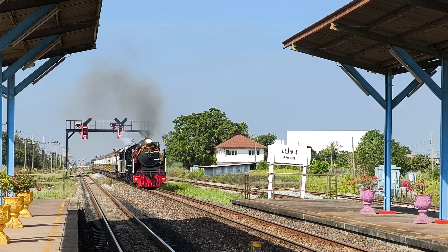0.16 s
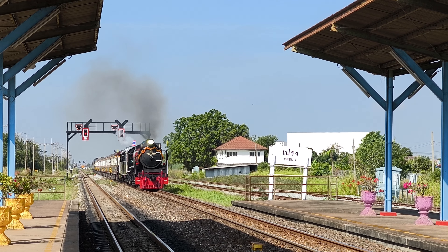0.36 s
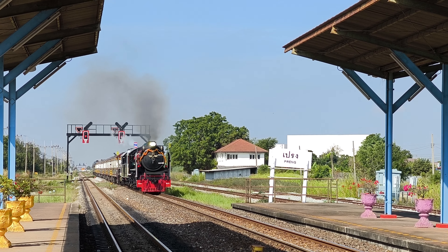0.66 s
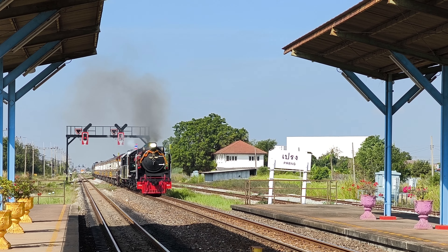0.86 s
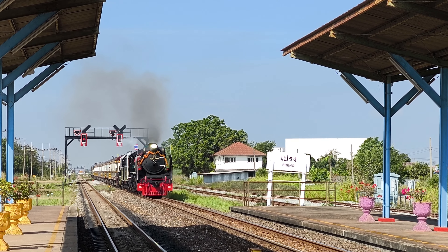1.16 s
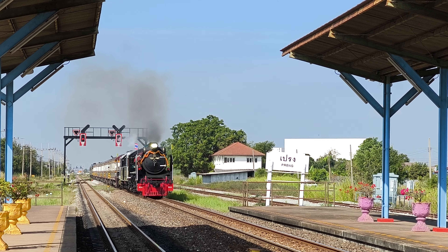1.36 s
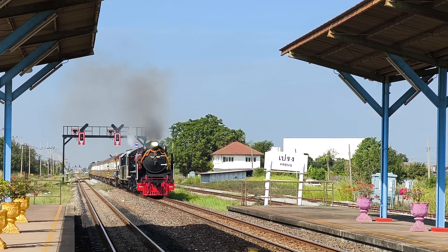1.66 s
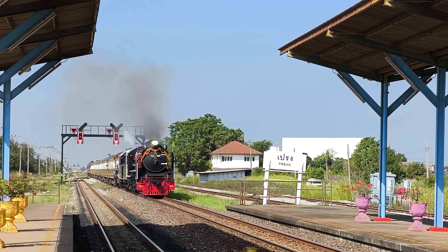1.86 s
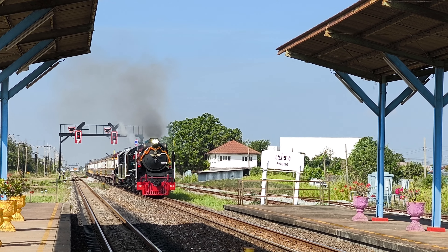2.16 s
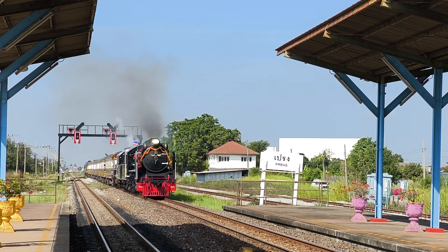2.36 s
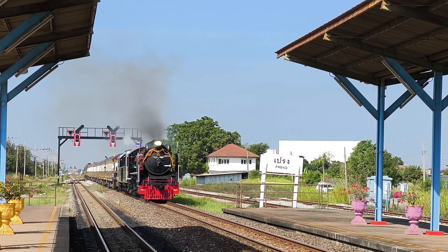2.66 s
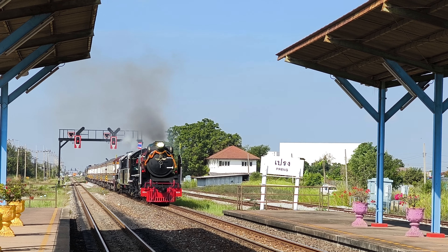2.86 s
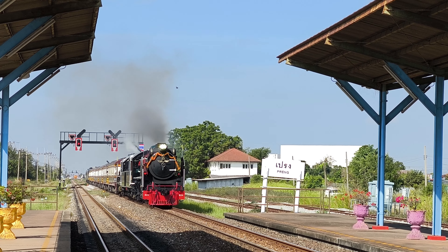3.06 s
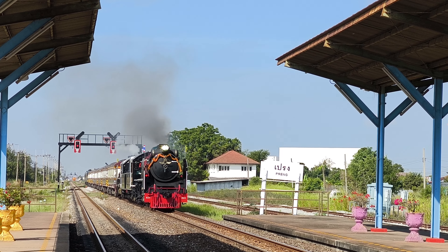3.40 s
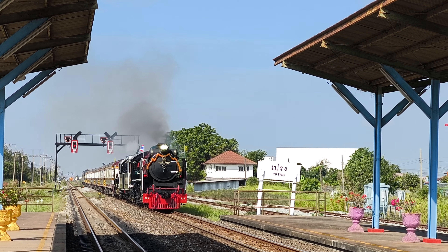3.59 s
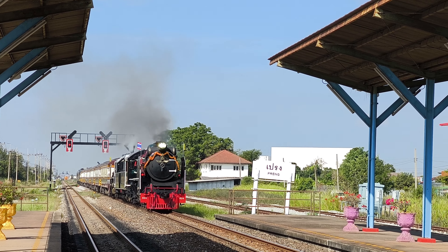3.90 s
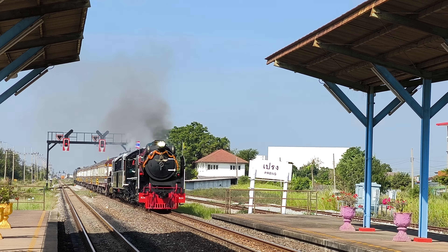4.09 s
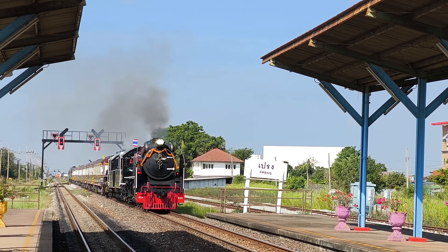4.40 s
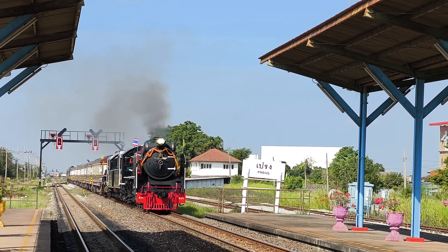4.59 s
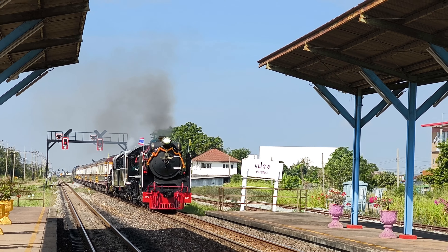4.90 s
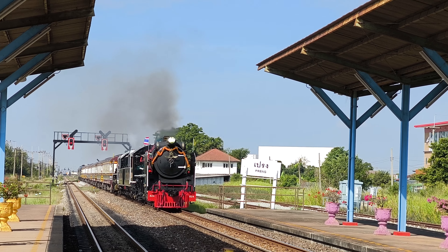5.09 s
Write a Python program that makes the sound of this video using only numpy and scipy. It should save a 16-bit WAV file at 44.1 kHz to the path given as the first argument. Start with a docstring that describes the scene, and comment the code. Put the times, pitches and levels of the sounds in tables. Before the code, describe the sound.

Outdoors at a station, an approaching steam locomotive holds a high, unsteady whistle already sounding at the start. It sags and thins, then returns stronger and brighter with steam hiss. Near the end it is clipped off briefly, resumes, then droops and dies into echoes. Wind thuds hard on the stereo microphone, mostly the right side in the first two seconds, over a faint rolling rumble.

```python
"""Steam whistle nearing a platform

A steam locomotive rolls in, holding one long whistle note: wavering partials over a noise hiss of steam.
The valve eases off, opens again and is twice shut near the end. The note also returns later and flatter
from something behind the engine, late from a wall ahead, and rings on in sparse taps among the buildings.
Noise makes the wind that buffets the two microphone ports and the far train; a faint far hoot is a soft tone."""
import sys
import numpy as np
from scipy import signal
from scipy.io import wavfile
from scipy.ndimage import uniform_filter1d, minimum_filter1d

SR = 44100
rng = np.random.default_rng(int(sys.argv[2]) if len(sys.argv) > 2 else 0)


def inscribe(sig):
    """Save sig as 16-bit PCM at rate SR to the path in sys.argv[1].

    A 1-D sig is mono; a 2-D sig holds one channel per row.
    Samples are clipped to [-1, 1] before scaling.
    """
    pcm = np.round(np.clip(np.atleast_2d(sig).T, -1, 1) * 32767)
    wavfile.write(sys.argv[1], SR, pcm.astype(np.int16))


N = 231436
LEAD = SR  # samples of run-up: the note is already sounding, so its echoes are too


def gain_of(db):
    """Decibels to a factor."""
    return 10 ** (np.asarray(db) / 20)


def evened(x):
    """Scales to rms 1."""
    return x / np.sqrt(np.mean(x ** 2) + 1e-20)


def read(points, hz):
    """Reads a spectrum on a log-frequency axis."""
    f, value = np.transpose(points)
    return np.interp(np.log(hz + 1), np.log(f + 1), value)


def curves(rows, t):
    """Reads every column of a curve table at the times t."""
    s, *columns = np.transpose(rows)
    return [np.interp(t, s, column) for column in columns]


def drift(size, hz):
    """Smooth chance of rms 1 that wanders up to about hz times a second."""
    low_pass = signal.butter(2, hz, fs=SR, output="sos")
    return evened(signal.sosfilt(low_pass, rng.standard_normal(size)))


def noise(level_db, size, same, length):
    """Two channels of noise from a dB field level_db(hz, t); same = likeness of the channels."""
    hop = size // 4
    t = np.arange(length // hop + 5) * hop / SR
    hz = np.fft.rfftfreq(size, 1 / SR)[:, None]
    a, b, c, d = rng.standard_normal((len(t), len(hz), 4)).T
    same = np.clip(same, 0, 1)
    left = a + 1j * b
    right = same * left + np.sqrt(1 - same ** 2) * (c + 1j * d)
    spectrum = np.array([left, right]) * gain_of(level_db(hz, t))
    return signal.istft(spectrum, nperseg=size, noverlap=size * 3 // 4)[1][:, :length]


# the valve is shut: start_s, closing_s (time it takes), reopens_s (it starts to open again)
SHUTS = [(4.3, .1, 4.465), (4.78, 0.193, 5.6)]
SHUT_DB, DROOP_HZ, REOPEN_S = -60, 200, .055  # fully shut: level and pitch drop; time to snap back


def valve(t):
    """Level change (dB) and pitch change (Hz): as the valve closes the note droops and dies."""
    closed = 0
    for start, closing, reopens in SHUTS:
        shutting = (t - start) / closing
        still_shut = 1 - (t - reopens) / REOPEN_S
        closed = closed + np.clip(np.minimum(shutting, still_shut), 0, 1)
    return SHUT_DB * closed ** 2, -DROOP_HZ * closed ** 1.2


# strength of the steam jet, heard in the overtones and the hiss: time_s, jet_db (relative)
JET = [(0.0, -26.5), (0.23, -23.5), (0.35, -27.5), (0.63, -34), (0.78, -36), (1.59, -40.5), (1.65, -30.5),
       (1.76, -25), (2.0, -29), (2.12, -24), (2.3, -29), (2.45, -26.5), (2.78, -29), (3.3, -26),
       (3.63, -27), (3.8, -28), (4.08, -23), (4.3, -23), (4.6, -20), (4.8, -30.5)]
FLUTTER_DB, FLUTTER_HZ = 2.5, 13.4  # rms depth and fastest rate of the puffing


def jet(t):
    """Strength of the jet in dB, puffing unevenly."""
    return curves(JET, t)[0] + FLUTTER_DB * drift(len(t), FLUTTER_HZ)


# the note sinks briefly: time_s, change_db
DIPS = [(.47, -5), (.88, -12.5), (1.129, -12), (1.43, -12), (1.721, -24), (2.53, -19), (2.78, -0.5),
        (3.36, -4), (3.5, -2.5), (3.67, -5), (3.79, -11), (4.03, -15), (4.18, -12), (4.74, -5)]
DIP_S = 0.018  # spread of each bell-shaped dip


def dips(t):
    """Brief sinkings of the note, in dB."""
    return sum(db * np.exp(-.5 * ((t - s) / DIP_S) ** 2) for s, db in DIPS)


FADING_DB, FADING_HZ = 1.5, 4  # rms depth and fastest rate


def fading(t):
    """Slow swell and sink in dB as moving air crosses one path to a port."""
    return FADING_DB * drift(len(t), FADING_HZ)


# pitch of the direct note as it arrives, before droop and wavering: time_s, pitch_hz
PITCH = [(-0.15, 1284), (0.07, 1292), (0.25, 1274), (0.5, 1251), (0.75, 1228), (1.3, 1223), (1.45, 1216),
         (1.6, 1227), (1.68, 1285), (1.95, 1303), (2.2, 1309), (3.0, 1304), (3.3, 1307), (3.55, 1293),
         (3.83, 1313), (4.05, 1295), (4.26, 1304), (4.53, 1288), (4.72, 1300)]
# partials of the bell: multiple (of the pitch), left_db, right_db (relative), left_lead_rad
PARTIALS = [(1, 2.5, 2.5, 0), (2, 1.5, -7.5, 2), (3, -0.5, -6.5, 5), (4, 3.5, -0.5, 3), (5, -3.5, -6, 2),
            (6, -9.5, -21.5, 4), (7, -14, -19, 4), (8, -23, -27, 2)]
# the fundamental reaches the ports by shifting paths: time_s, left_lead_rad (extra)
SWAY = [(.1, 1.28), (.85, 0.38), (1.35, 1.46), (2.1, 1.16), (2.4, 3.22), (3.9, 4.27), (4.15, 2.08),
        (4.9, 1.6)]
WANDER_RAD, WANDER_HZ = .3, 3  # quick unsteadiness of that lead: rms and fastest rate


def note(t, ratio, left_note_db, right_note_db, jet_db, overtone_db, unsteady, droop):
    """The whistle bell: partials on one wavering pitch; moving air makes each one swell and fade by itself."""
    valve_db, droop_hz = valve(t)
    steady_hz = (curves(PITCH, t)[0] + droop * droop_hz) * ratio
    hz = steady_hz * (1 + 0.001057 * drift(len(t), 23.8))
    phase = 2 * np.pi * np.cumsum(hz) / SR
    sway = curves(SWAY, t)[0] + WANDER_RAD * drift(len(t), WANDER_HZ)
    out = np.zeros((2, len(t)))
    for k, left_db, right_db, lead in PARTIALS:
        db = valve_db
        if k == 1:  # only the fundamental follows the note level and the sway
            left_db, right_db = left_db + left_note_db, right_db + right_note_db
            lead = lead + sway
        else:
            # a weak blow loses its high partials first
            thin_db = 0.81 * (k - 2) * np.minimum(jet_db + 29.5, 0)
            db = 1.46 * valve_db + jet_db + thin_db + overtone_db
        # level and phase both waver; high partials smear more
        waver = drift(len(t), 29.4) + 1j * drift(len(t), 18.6)
        swell = 1 + unsteady * k ** 1.29 * waver
        wave = gain_of(db) * evened(abs(swell)) * np.exp(1j * (k * phase + np.angle(swell)))
        out[0] += (wave * np.exp(1j * lead)).real * gain_of(left_db)
        out[1] += wave.real * gain_of(right_db)
    return out


# colour of the escaping steam: freq_hz, density_db (relative, per Hz)
HISS = [(500, -40), (900, -29), (1500, -5), (2300, -1), (2900, -10), (3400, -1), (5600, -1), (6900, -2.5),
        (8300, -7), (10000, -12.5), (12000, -12.5), (14500, -17.5)]
# stereo lean of the hiss: freq_hz, left_minus_right_db
HISS_BALANCE = [(700, -15), (1800, 3), (2900, 4.5), (3800, 23.5), (7000, -8), (8500, 21.5), (11000, 5.5),
                (14500, 10.5)]
HISS_DB = -28  # at a jet of -26 dB with the valve open
HISS_SHARE, HISS_SHUT_SHARE = 0.85, 0.25  # how far the hiss follows the jet and the valve, dB per dB


def steam(t, jet_db):
    """Hiss of the jet at the lip of the bell: noise in soft patches."""
    def field(hz, s):
        grain = rng.standard_normal((len(hz), len(s)))
        patches = evened(uniform_filter1d(uniform_filter1d(grain, 8, 0), 12, 1))
        balance = read(HISS_BALANCE, hz) / 2
        # the treble of the jet grows and the low hiss sinks as the engine comes on; s counts from the start of
        # the run-up
        nearer_db = 0.23 * (s - 3.5) * np.log2(hz / 5000 + 0.15)
        return read(HISS, hz) + nearer_db + 2.5 * patches + np.array([balance, -balance])
    level_db = HISS_DB + HISS_SHARE * (jet_db + 26) + HISS_SHUT_SHARE * valve(t)[0]
    return gain_of(level_db) * evened(noise(field, size=512, same=0.16, length=len(t)))


# ring among the buildings: freq_hz, t60_s (time to die by 60 dB)
YARD = [(600, 1.3), (1300, 1.8), (3000, 1.0), (6000, .7), (12000, .35)]


def yard(x):
    """Sparse reflections from roofs and walls, each band dying at its own speed."""
    taps = np.zeros((2, 2 * SR))
    slots = np.arange(900, 2 * SR - 40, 40)
    at = slots + rng.integers(0, 40, (2, len(slots)))  # one tap at a random place in each slot
    np.put_along_axis(taps, at, rng.choice([-1., 1.], at.shape), 1)
    hz, t, z = signal.stft(taps, SR, nperseg=256)
    decay_db = -60 * t / read(YARD, hz)[:, None]
    tail = signal.istft(z * gain_of(decay_db), SR, nperseg=256)[1]
    tail = tail / np.linalg.norm(tail[0])
    return signal.fftconvolve(x, tail, axes=1)[:, :x.shape[1]]


# blow of the direct fundamental at each port: time_s, left_db, right_db (before its partial level)
BLOW = [(0.0, -19.5, -26), (0.4, -13.5, -13.5), (0.75, -14, -14), (0.95, -22, -26), (1.4, -22.5, -21),
        (1.7, -21.5, -15.5), (1.9, -7.5, -12), (2.1, -15, -14.5), (2.4, -13.5, -15.5), (2.7, -16, -7),
        (3.1, -4, -3.5), (3.35, -7.5, -14.5), (3.65, -14, -11), (3.9, -9.5, -16.5), (4.1, -10, -33),
        (4.25, -10, -6.5), (4.55, -12.5, -19), (4.68, -10.5, -18.5), (4.8, -12.5, -9.5)]
# fundamental of the echo as it arrives: time_s, note_db (before its partial level)
ECHO = [(0, -17.5), (.3, -11), (.6, -25.5), (.9, -29), (1.8, -30), (2, -17.5), (2.7, -10.5), (3.1, -31),
        (3.6, -22), (4.1, -24), (4.5, -24.5), (4.9, -22.5), (5.25, -18)]
# overtones of the echo: time_s, offset_db (added to the jet strength)
ECHO_OVERTONES = [(0, -11.5), (1.4, -3), (2.7, -13), (4.3, -18), (5, -6)]
ECHO_LAG_S, ECHO_PITCH = .148, .9685  # lag at time zero, pitch ratio
WALL_S, WALL_DB, WALL_DB_PER_S = .21, -7, 6  # delay, level at 5 s, growth as the engine nears the wall
YARD_DB = -6.5


def whistle():
    """Direct note and hiss, the flatter echo from behind the moving engine, a late return and the yard's ring."""
    t = np.arange(-LEAD, N) / SR
    left_db, right_db = curves(BLOW, t) + dips(t)
    jet_db = jet(t)
    bell = note(t, 1, left_db + fading(t), right_db + fading(t), jet_db,
                overtone_db=5, unsteady=.14, droop=1)
    direct = bell + steam(t, jet_db)
    # the engine draws away from the reflector: the echo is stretched in time and falls ever further behind;
    # over that scattered path little is heard of the droop
    then = ECHO_PITCH * t - ECHO_LAG_S
    echo_db = curves(ECHO, t)[0]
    echo = note(then, ECHO_PITCH, echo_db, echo_db, jet(then),
                overtone_db=curves(ECHO_OVERTONES, t)[0], unsteady=.1, droop=.15)
    # one late, dull return at full pitch
    dulled = uniform_filter1d(direct, size=5, axis=1)
    late = np.roll(dulled, round(WALL_S * SR), axis=1)
    wall = gain_of(WALL_DB + WALL_DB_PER_S * (t - 5)) * late
    ring = gain_of(YARD_DB) * yard(direct + .5 * echo)
    return (direct + echo + wall + ring)[:, LEAD:]


# wind strength at each port, before the low cut: time_s, left_db, right_db
WIND = [(0.0, -30, -23), (0.4, -27.5, -26), (0.67, -19, -18.5), (1.0, -22, -13.5), (1.17, -25, -17.5),
        (1.33, -25, -11.5), (1.5, -27, -20.5), (1.67, -24, -19.5), (1.83, -27, -11.5), (2.0, -26.5, -26.5),
        (2.8, -40, -31.5), (3.3, -30, -26.5), (3.8, -42, -30), (4.3, -27.5, -32.5), (4.6, -25.5, -25.5),
        (4.83, -34.5, -32), (5.1, -25.5, -25.5)]
# colour of weak wind: freq_hz, density_db (relative, per Hz)
CALM = [(30, -52), (55, -40), (85, 5), (140, -3.5), (250, -14), (500, -37), (1000, -36), (2000, -74)]
# colour of strong gusts: freq_hz, density_db (relative, per Hz)
GUST = [(30, -53), (55, -15), (90, -1), (170, 0), (300, -8), (500, -17.5), (1000, -38.5), (2000, -81)]
# the strongest eddies: time_s, port (0 left, 1 right), peak_db (nominal, before the low cut)
BUFFETS = [(0.077, 0, -18), (0.133, 1, -9), (0.461, 0, -22), (0.517, 1, -7), (0.561, 1, -1), (0.72, 1, -4),
           (0.817, 1, -1.5), (0.894, 0, -15), (0.894, 1, -6), (0.949, 1, 0), (0.991, 1, -2),
           (1.085, 1, 0.5), (1.2, 1, -2), (1.27, 1, -15), (1.356, 1, 2), (1.458, 0, -20), (1.502, 0, -16),
           (1.513, 1, -13), (1.557, 0, -23), (1.693, 1, -6), (1.786, 1, 4.5), (1.978, 1, -9.5),
           (2.302, 1, -16)]
BUFFET_S = 0.0077  # spread of each bell-shaped burst


def wind():
    """Lumpy pressure on each port by itself; strong gusts reach higher."""
    t = np.arange(N) / SR
    out = np.zeros((2, N))
    calm = noise(lambda hz, s: read(CALM, hz), size=1024, same=0.35, length=N)
    gust = noise(lambda hz, s: read(GUST, hz), size=1024, same=0, length=N)
    for port, db in enumerate(curves(WIND, t)):
        share = np.clip((db + 34.5) / 12, 0, 1)  # the stronger the wind, the more gust in it
        lumps = evened(gain_of(4.07 * drift(N, 19)))  # eddies tumbling past the opening
        weak = np.sqrt(1 - share) * evened(calm[port])
        strong = np.sqrt(share) * lumps * evened(gust[port])
        out[port] = gain_of(db) * (weak + strong)
    # the gust colour at an even strength
    steady = gust / np.sqrt(uniform_filter1d(gust ** 2, 600, axis=1) * 2 + 1e-12)
    for s, port, db in BUFFETS:
        burst = np.exp(-.5 * ((t - s) / BUFFET_S) ** 2)
        out[port] += gain_of(db) * burst * steady[port]
    return out


# rolling wheels and far station air: freq_hz, density_db (relative, per Hz)
TRAIN = [(40, -18), (90, 4.5), (200, -8), (420, -14.5), (560, -8), (700, -12.5), (1500, -17.5),
         (4000, -17.5), (9000, -33), (14500, -44)]
TRAIN_DB, NEARING_DB_PER_S = -33, 0.49
CLEARING_DB = 1.16  # treble gain per second and per octave above 4 kHz


def train():
    """Far rumble of the rolling train: noise that grows and gains treble."""
    def field(hz, s):
        octaves_up = np.log2(np.maximum(hz / 4000, 1))
        return read(TRAIN, hz) + CLEARING_DB * s * octaves_up
    rumble = evened(noise(field, size=1024, same=.6, length=N))
    return gain_of(TRAIN_DB + NEARING_DB_PER_S * np.arange(N) / SR) * rumble


# a faint far hoot: start_s, end_s, pitch_hz
HOOT = (3.44, 3.66, 672)
HOOT_DB = -36  # at its peak


def hoot():
    """One soft, slightly wavering tone from far off."""
    start, end, hz = HOOT
    t = np.arange(N) / SR
    shape = np.sin(np.pi * np.clip((t - start) / (end - start), 0, 1))
    phase = 2 * np.pi * np.cumsum(hz + 4 * drift(N, 6.6)) / SR
    return gain_of(HOOT_DB) * shape * np.sin(phase)


def scene():
    """Everything that reaches the microphone."""
    return whistle() + wind() + train() + hoot()


LOW_CUT_HZ, EDGE_HZ = 78, 14280  # lower and upper band limits
THRESHOLD_DB, PEAK_FALL_DB_PER_S = -3.5, 90  # where limiting starts; how fast the held peak sinks


def record(dry):
    """Low cut, a soft limiter on each channel that the gusts push down, and the band limit."""
    x = signal.sosfilt(signal.butter(4, LOW_CUT_HZ, "high", fs=SR, output="sos"), dry)
    peak = -minimum_filter1d(-abs(x), 101, axis=1)  # the largest sample nearby
    peak_db = 20 * np.log10(peak + 1e-9)
    fall = np.arange(N) * PEAK_FALL_DB_PER_S / SR
    held_db = np.maximum.accumulate(peak_db + fall, axis=1) - fall
    over_db = np.maximum(held_db - THRESHOLD_DB, 0)
    x = x / gain_of(.75 * uniform_filter1d(over_db, 100, axis=1))  # takes off three quarters of the excess
    band_limit = signal.firwin(1023, EDGE_HZ, window=("kaiser", 10), fs=SR)
    return signal.oaconvolve(x, band_limit[None], "same")


dry = scene()
out = record(dry)
inscribe(out)
```